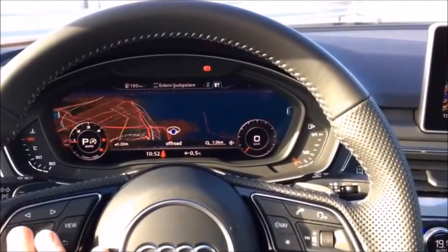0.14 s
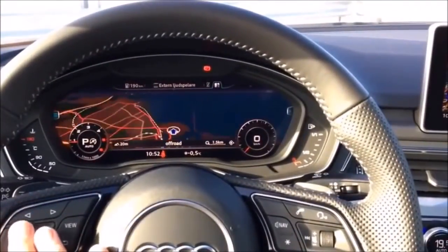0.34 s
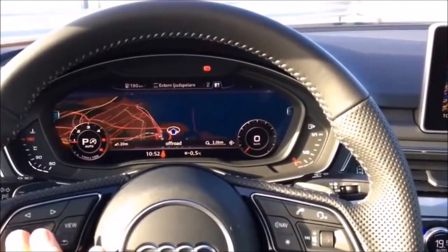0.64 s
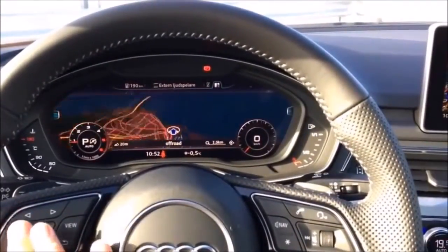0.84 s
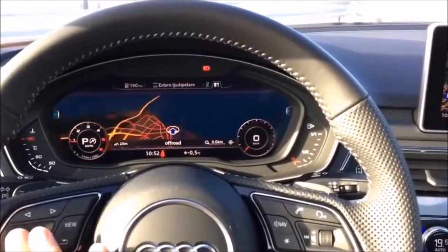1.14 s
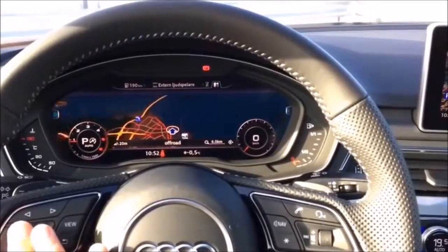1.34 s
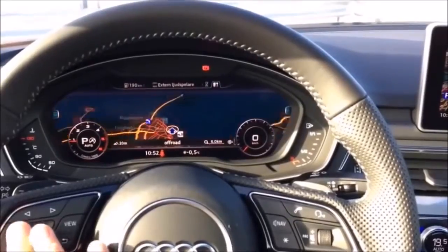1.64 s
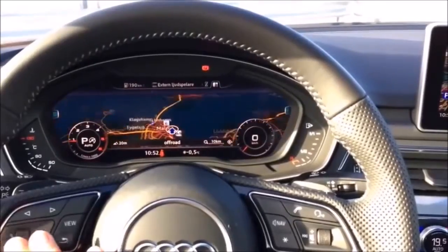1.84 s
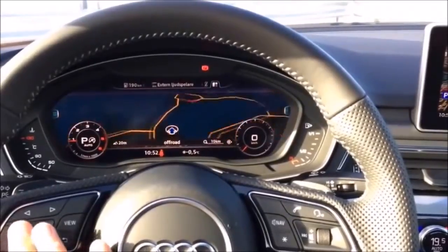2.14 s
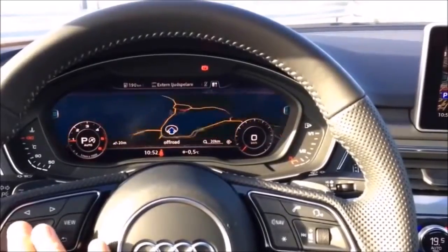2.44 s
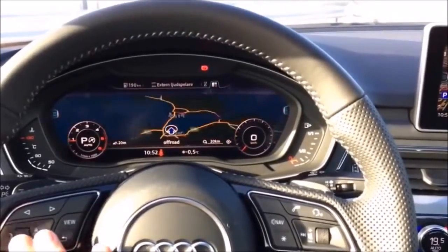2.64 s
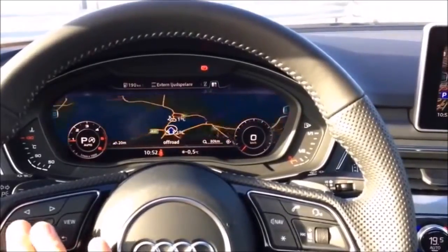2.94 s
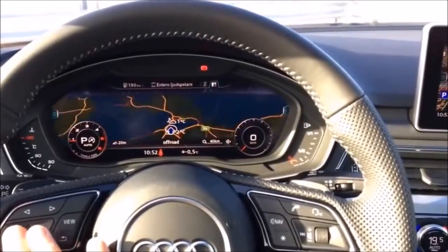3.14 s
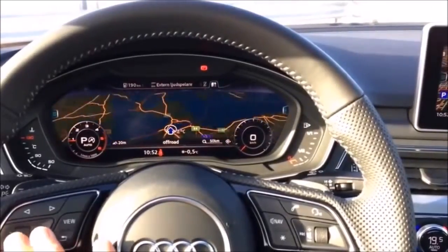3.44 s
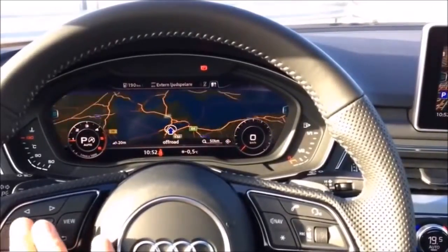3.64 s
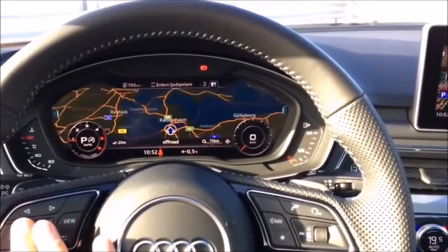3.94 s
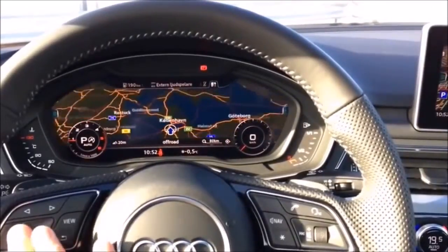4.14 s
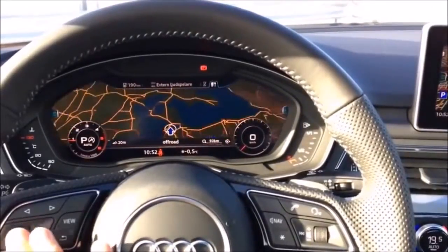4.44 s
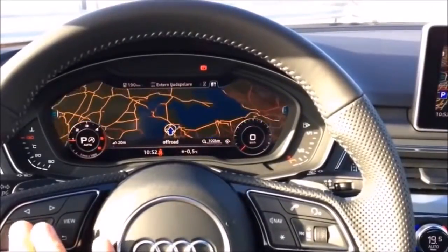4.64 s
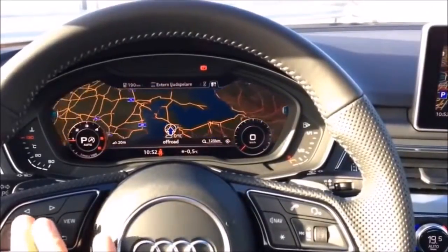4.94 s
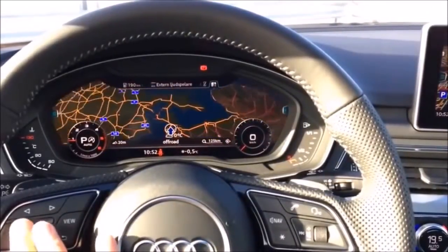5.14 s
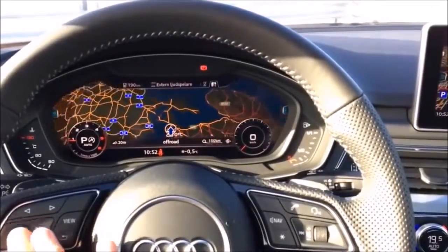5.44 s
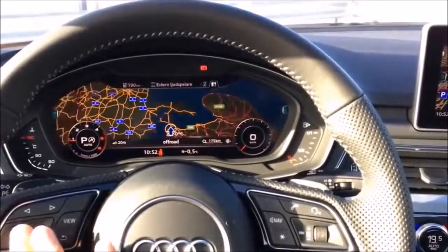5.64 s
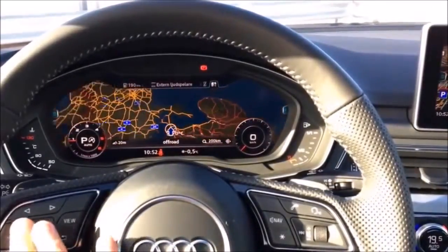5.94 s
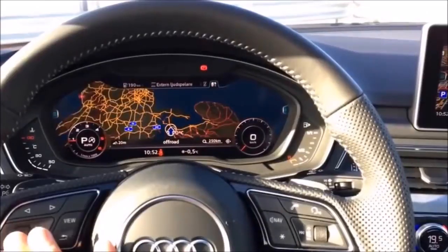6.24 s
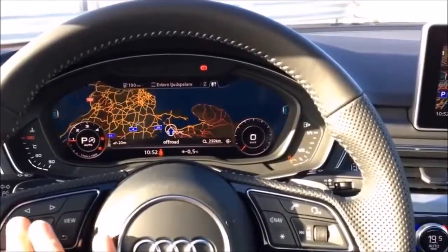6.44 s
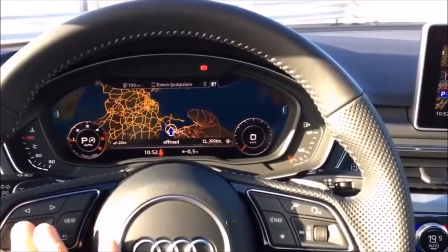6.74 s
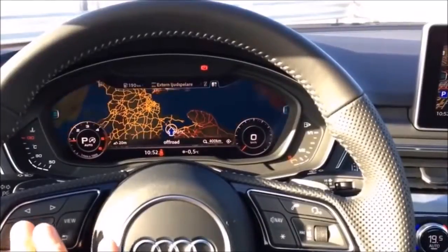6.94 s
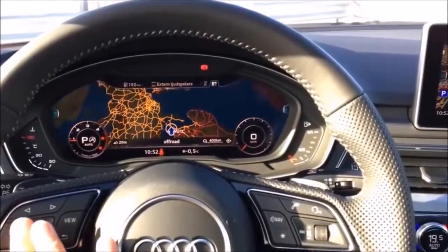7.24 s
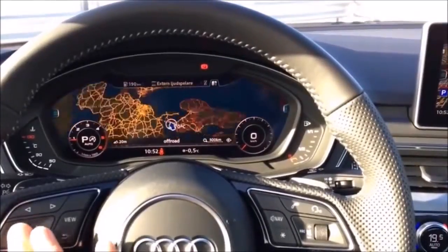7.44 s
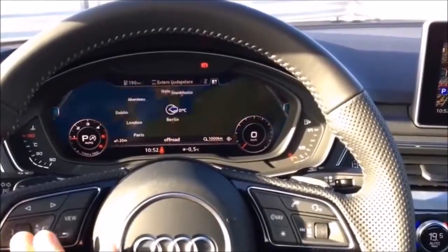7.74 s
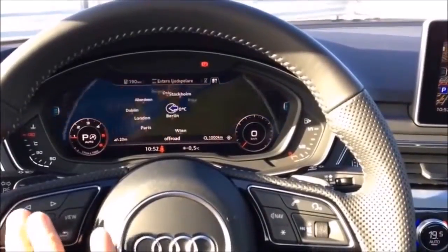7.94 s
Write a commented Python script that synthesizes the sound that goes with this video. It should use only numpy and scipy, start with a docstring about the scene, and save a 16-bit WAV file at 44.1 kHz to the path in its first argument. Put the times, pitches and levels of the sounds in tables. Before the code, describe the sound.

Close, dry ratcheting clicks with short thumb scuffs from a steering-wheel scroller, above a steady low idling hum and muffled cabin air.

```python
"""In a parked car the engine idles as a wavering stack of harmonics and the ventilation blows as shaped noise.
Over this bed a thumb rolls a small plastic scroll wheel on the steering wheel, about three notches a second.
At each notch the wheel takes up its play with a light tick, scuffs under the thumb as it rubs up the detent
ramp, snaps over, rebounds and settles: bursts and grainy noise through resonances. Stray nudges click between.
From two seconds on, the trim gives a few dull ticks, each a blow ringing a larger panel."""
import sys
import numpy as np
from scipy import signal
from scipy.fft import rfft, irfft
from scipy.io import wavfile

SR = 44100
rng = np.random.default_rng(int(sys.argv[2]) if len(sys.argv) > 2 else 0)


def put_to_file(sound):
    """Save the sound as 16-bit audio at rate SR, in the file named by the first command-line argument."""
    columns = np.atleast_2d(sound).T  # one column per channel
    safe = np.clip(columns, -1, 1)
    whole_steps = np.round(safe * 32767)
    wavfile.write(sys.argv[1], SR, whole_steps.astype(np.int16))


N = 357210
TIME = np.arange(N) / SR
SINCE = np.arange(-int(.03 * SR), int(.08 * SR)) / SR   # time around one contact [s]
CUTOFF_HZ = 15740   # top of the audible band here

# resonances of the wheel and switch housing, relative levels:
# (frequency [Hz], width [Hz], level when snapped [dB], level when rubbed [dB])
WHEEL_MODES = [(1200, 260, -7, 1.5), (1900, 290, 4, 10.5), (2330, 137, 6.5, 7), (2933, 190, 0.5, 6),
               (3260, 200, -4.5, -6.5), (4080, 79, -7.5, -3.5), (4400, 92, -7, 4.5), (4686, 92, 0.5, 2),
               (5720, 270, -7.5, -3), (6000, 200, -3.5, 1.5), (6640, 180, -7.5, -2.5), (7740, 250, -5, -6),
               (8350, 180, -5.5, -4), (8750, 220, 1, -11), (9100, 175, 2, -2.5), (9770, 190, -1.5, 3),
               (11020, 200, -4, 3.5), (12000, 410, -5, -5), (12930, 220, -2, 1), (13400, 290, -5.5, -3),
               (14400, 380, -5, -6), (15500, 780, -12, -13)]
# one row per notch of the wheel; grip time counts back from the snap, rebound and settle times on from it:
# (snap time [s], snap level [dB], grip time [s], grip level [dB], rebound time [s], rebound level [dB],
#  settle time [s], settle level [dB], rub level [dB], spring loading time [s], thumb drag level [dB],
#  coasting level [dB], spring ring [dB], brightness [dB per octave])
WHEEL_NOTCHES = [(.3, -61.5, .093, -84, 0.1, -70, .13, -86, -83, .025, -70, -96, 6, -.5),
                 (0.797, -59, .119, -69, .047, -69, 0.054, -70, -70, 0.053, -66, -81, 1, -1),
                 (1.274, -61, .057, -70, 0.048, -62, 0.094, -65, -75, .02, -64, -74.5, 3, 0.5),
                 (1.743, -54, .103, -71, 0.029, -69, .092, -74, -65, 0.032, -65, -77, 0, -.5),
                 (2.143, -54.5, .116, -72, 0.025, -58.5, .071, -73, -66.5, 0.047, -62, -77, 7.5, -1),
                 (2.535, -58.5, .13, -72, .033, -63, .06, -80, -67.5, 0.054, -63, -89, -2, 0),
                 (2.929, -57, .139, -69, 0.033, -63, .07, -64, -68, 0.041, -67, -78, -3, .5),
                 (3.321, -56, .128, -74, 0.027, -57.5, .075, -64, -67, 0.022, -62, -75, 0, 0),
                 (3.689, -53, 0.1, -76, 0.026, -57.5, .06, -67, -67, 0.036, -64, -77, 5, 0),
                 (4.011, -65, .106, -68, .036, -65, .078, -82, -71, 0.047, -68, -87, 0, 0.5),
                 (4.313, -61.5, .098, -68, .024, -58.5, .055, -65, -64, 0.028, -66, -75.5, -2, .3),
                 (4.646, -58.5, 0.1, -68, .029, -58.5, .077, -69, -65.5, .062, -65, -70.5, -1, -1),
                 (4.98, -62.5, 0.12, -75, 0.03, -62, 0.04, -66, -71, 0.046, -70, -79, 0, 0),
                 (5.297, -56, .087, -72, 0.027, -62, .06, -64, -73, 0.024, -65, -73, 1, 1),
                 (5.649, -55, .085, -66, .014, -71, .05, -63.5, -69, 0.043, -63, -90, -3, 1),
                 (5.976, -62, 0.11, -73, 0.035, -60.5, .055, -81, -69, 0.081, -66, -79, -4, -1),
                 (6.535, -55.5, 0.098, -82, 0.012, -61, 0.038, -66, -68, 0.035, -67, -74, 7, -0.5),
                 (6.934, -54, .094, -69, 0.023, -62, .043, -64, -62, 0.054, -57.5, -71, 1.5, -0.7),
                 (7.319, -66, 0.13, -69, .028, -64, 0.045, -71, -63.5, 0.15, -62.5, -80, -3, -2),
                 (7.648, -59, .103, -65, 0.019, -61, 0.037, -58, -61, 0.088, -63, -67.5, -3, 0.5),
                 (8.005, -56, .109, -72, 0.015, -54, .029, -63, -63.5, .079, -65, -70.5, 3, 0)]


def from_db(db):
    """Decibels to gain."""
    return 10 ** (np.asarray(db) / 20)


def drift(rate):
    """Smooth wander through 4000 random values of spread 1, `rate` a second; then the last one holds."""
    knots = rng.standard_normal(4000)
    return np.interp(TIME * rate, np.arange(len(knots)), knots)


def body(force, modes):
    """Parallel resonances (Hz, width, dB) of alternating sign, scaled so that white noise keeps its power."""
    out, power = 0, 0
    for k, (hz, width, level_db) in enumerate(modes):
        r = np.exp(-np.pi * width / SR)   # pole radius: a narrower mode rings longer
        gain = (-1) ** k * from_db(level_db)
        zeros = gain * (1 - r * r) / 2 * np.array([1, 0, -1])
        poles = [1, -2 * r * np.cos(2 * np.pi * hz / SR), r * r]
        out = out + signal.lfilter(zeros, poles, force + 1e-18)
        power += gain ** 2 * (1 - r * r) / 2
    return out / np.sqrt(power)


def engine(speed_wander, waver_db):
    """Harmonics of the firing rate; the idle speed hunts slightly and each harmonic wavers."""
    # engine hum: (multiple of the firing rate, rms level before wavering [dB])
    orders = [(1, -63.5), (2, -52), (3, -57.5), (4, -61), (6, -74.5), (7, -75.5), (8, -81), (9, -77),
              (12, -69), (13, -75.5), (15, -77)]
    firing_hz = 28.71 * (1 + speed_wander * drift(3))
    phase = 2 * np.pi * np.cumsum(firing_hz) / SR
    hum = np.zeros(N)
    for order, level_db in orders:
        strength = np.sqrt(2) * from_db(level_db + waver_db * drift(6.5))
        hum += strength * np.sin(order * phase + rng.uniform(0, 2 * np.pi))
    return hum


def cabin_air():
    """Steady rumble and airflow noise, muffled by the upholstery and coloured by the ducts."""
    # cabin rumble and ventilation, ahead of the duct boosts: (frequency [Hz], density [dB per Hz])
    air_spectrum = [(18, -88), (42, -74), (70, -72.5), (125, -74), (160, -79.5), (260, -80.5), (365, -84),
                    (440, -95.5), (780, -98.5), (1600, -99), (2100, -102.5), (2350, -111), (2750, -117),
                    (4800, -123), (9300, -124), (11000, -127), (15500, -129)]
    # air duct resonances: (frequency [Hz], width [Hz], boost [dB])
    duct_modes = [(603, 120, 4.5), (949, 76, 5), (1430, 58, 8.5)]
    hz = np.maximum(np.arange(N // 2 + 1) * SR / N, 1)
    points_hz, points_db = np.transpose(air_spectrum)
    level_db = np.interp(np.log(hz), np.log(points_hz), points_db)
    for centre, width, boost_db in duct_modes:
        level_db = level_db + boost_db / (1 + (2 * (hz - centre) / width) ** 2)
    hiss = rfft(rng.standard_normal(N))
    return irfft(hiss * from_db(level_db), N) * np.sqrt(SR / 2)


def contacts():
    """Each notch goes grip, snap, rebound, settle; gives thumb grips and spring blows as (s, dB)."""
    grips, blows = [], []
    for s, snap_db, grip_s, grip_db, rebound_s, rebound_db, settle_s, settle_db, *_ in WHEEL_NOTCHES:
        grips.append((s - grip_s, grip_db))
        blows += [(s, snap_db), (s + rebound_s, rebound_db), (s + settle_s, settle_db)]
    return grips, blows


def chatter(rise_s, fall_s):
    """A contact is a brief flurry of tiny impacts that builds up and dies away; peak 1."""
    envelope = np.exp(np.minimum(SINCE / rise_s, -SINCE / fall_s))
    return envelope * rng.choice([-1, 1], len(SINCE))


def wheel_body(force, s, mode_db, scatter_db):
    """The nearest notch sets brightness and spring ring; each contact gets its own mode mix and tuning."""
    mode_scatter = 0.0083   # detuning spread, as a share of each frequency
    spring_hz, spring_width_hz = 4730, 300   # the detent spring rings here, freer at some notches
    tilt_pivot_hz = 6000   # brightness turns the spectrum about this point
    crack_db, crack_low_hz = -12.5, 5460   # plain broadband crack of the contact itself
    hz, width = np.transpose(WHEEL_MODES)[:2]
    *_, spring_db, tilt_db = min(WHEEL_NOTCHES, key=lambda notch: abs(notch[0] - s))
    spring_ring_db = spring_db * np.exp(-((hz - spring_hz) / spring_width_hz) ** 2)
    brightness_db = tilt_db * np.log2(hz / tilt_pivot_hz)
    shift, strength = rng.standard_normal((2, len(hz)))
    tuned_hz = hz * (1 + mode_scatter * shift)
    mixed_db = mode_db + spring_ring_db + brightness_db + scatter_db * strength
    ringing = body(force, zip(tuned_hz, width, mixed_db))
    crack_band = signal.butter(2, [crack_low_hz, CUTOFF_HZ], "band", fs=SR, output="sos")
    return ringing + from_db(crack_db) * signal.sosfilt(crack_band, force)


def add(track, s, sound):
    """Lay the sound of one contact into the track at time s."""
    at = round((s + SINCE[0]) * SR)
    track[at:at + len(sound)] += sound[:N - at]


def wheel_clicks(events, mode_db, rise_s, fall_s, scatter_db):
    """Short contacts that set the wheel ringing."""
    out = np.zeros(N)
    for s, level_db in events:
        force = chatter(rise_s, fall_s)
        click = wheel_body(force, s, mode_db, scatter_db)
        treble = np.std(np.diff(click))   # the level is that of the treble, against the force
        add(out, s, from_db(level_db) * click * np.std(force) / treble)
    return out


def slide(pressure, grain_db, stick_slip_db):
    """Grainy, catching noise whose strength follows the pressure."""
    roughness = from_db(grain_db * drift(600) + stick_slip_db * drift(130))
    return pressure * roughness * rng.standard_normal(N)


def wheel_rub(swell, scatter_db):
    """The detent rubs harder as its spring is loaded, then the wheel coasts and rubs to a stop."""
    release_s = 0.045   # the snap unloads the spring and the rubbing eases
    coast_s, run_out_s = 0.071, 0.099   # end of steady coasting, standstill: both after the snap
    *_, rubbed_db = np.transpose(WHEEL_MODES)
    grain = slide(1, grain_db=1.5, stick_slip_db=2.9)
    out = np.zeros(N)
    for s, *_, rub_db, load_s, _, coast_db, _, _ in WHEEL_NOTCHES:
        near = np.abs(TIME - s) < .2   # all of a notch's rubbing lies this close to its snap [s]
        since = TIME[near] - s
        loading = from_db(rub_db) * np.interp(since, [-load_s, 0, release_s], [0, 1, 0]) ** swell
        coasting = from_db(coast_db) * np.interp(since, [0, release_s, coast_s, run_out_s], [0, 1, 1, 0])
        out[near] += wheel_body((loading + coasting) * grain[near], s, rubbed_db, scatter_db)
    return out


def thumb_drag(start_share, full_share):
    """While it loads the spring the soft thumb scuffs the ribbed rim: a duller scrape, gone by the snap."""
    # ribbed rim under the thumb, relative levels: (frequency [Hz], width [Hz], level [dB])
    rim_modes = [(1350, 320, -4), (1720, 240, 2), (1960, 140, 5), (2340, 130, 3), (2960, 170, -2),
                 (4720, 200, -17)]
    ease_s = 0.0044   # the drag eases just before the snap
    pressure = np.zeros(N)
    for s, *_, load_s, drag_db, _, _, _ in WHEEL_NOTCHES:
        stages_s = [-start_share * load_s, -full_share * load_s, -ease_s, 0]
        pressure += from_db(drag_db) * np.interp(TIME - s, stages_s, [0, 1, 1, 0])
    return body(slide(pressure, grain_db=1.5, stick_slip_db=2.5), rim_modes)


def wheel_creep(mode_db, scatter_db):
    """A short bright scratch swells into each snap as the tooth starts to slip over the crest."""
    creep_db, creep_s = -11, .016   # gain on the snap level, duration
    out = np.zeros(N)
    for s, snap_db, *_ in WHEEL_NOTCHES:
        swell = np.interp(SINCE, [-creep_s, 0], [0, 1], right=0) ** .5
        force = from_db(snap_db + creep_db) * swell * rng.standard_normal(len(SINCE))
        add(out, s, wheel_body(force, s, mode_db, scatter_db))
    return out


def thumbwheel():
    """Snaps and rubbing drive the same modes, from different points of the wheel."""
    # between notches the thumb nudges the wheel against its detent: (time [s], level [dB])
    nudges = [(.942, -72), (1.491, -60.5), (3.058, -65), (4.429, -67), (5.941, -64), (6.626, -63),
              (7.224, -67), (7.238, -61.5), (7.629, -56), (7.707, -65), (7.948, -70)]
    *_, snapped_db, rubbed_db = np.transpose(WHEEL_MODES)
    grips, blows = contacts()
    touches = wheel_clicks(grips, rubbed_db, rise_s=.0018, fall_s=.0035, scatter_db=3.0)
    rub = wheel_rub(swell=0.88, scatter_db=0.1)
    drag = thumb_drag(start_share=0.85, full_share=0.64)
    creep = wheel_creep(snapped_db, scatter_db=3.5)
    snaps = wheel_clicks(blows + nudges, snapped_db, rise_s=.002, fall_s=.0028, scatter_db=2.4)
    return touches + rub + drag + creep + snaps


def trim():
    """A larger panel rings lower and longer: it flicks out and back and rattles briefly."""
    # dull ticks: (time [s], mean level [dB], lowest frequency excited [Hz], hardness as cut-off [Hz])
    ticks = [(1.987, -69.5, 1600, 1600), (4.03, -68.5, 1200, 2000), (4.686, -56.5, 850, 6000),
             (6.597, -66, 1630, 1100)]
    # trim panel resonances, relative levels: (frequency [Hz], width [Hz], level [dB])
    panel_modes = [(850, 90, 5), (1108, 86, 7.5), (1364, 53, 6), (1600, 90, 3.5), (1760, 74, 2),
                   (1850, 120, 1), (2090, 125, 6), (2205, 100, 6), (2580, 52, 2.5), (3150, 71, -5),
                   (3480, 98, -9), (3970, 180, -12), (4450, 95, -8), (5020, 150, -12), (5550, 270, -14),
                   (6180, 300, -12), (7100, 900, -21)]
    flick_back_s, flick_back_share = 0.0041, 0.69   # spring-back delay, share of the blow's strength
    rattle_s, rattle_share = .009, .12   # decay, share of the blow's strength
    out = np.zeros(N)
    for s, level_db, low_hz, hard_hz in ticks:
        blow = 1.0 * (SINCE == 0)
        flick_back = flick_back_share * np.roll(blow, round(flick_back_s * SR))
        rattle = rattle_share * (SINCE > 0) * chatter(rattle_s, rattle_s)
        force = blow - flick_back + rattle
        # soft blows are dull, light ones thin
        force = signal.sosfilt(signal.butter(2, hard_hz, fs=SR, output="sos"), force)
        force = signal.sosfilt(signal.butter(4, low_hz, "high", fs=SR, output="sos"), force)
        tick = body(force, panel_modes)
        add(out, s, from_db(level_db) * tick / np.std(tick))
    return out


def scene():
    """Everything is close by in a dead-sounding cabin: the layers simply add, with no reverberation."""
    bed = engine(speed_wander=0.00304, waver_db=0.9) + cabin_air()
    return (bed + thumbwheel() + trim())[None, :]


def record(dry):
    """The top is cut steeply."""
    return signal.sosfilt(signal.ellip(10, .2, 70, CUTOFF_HZ, fs=SR, output="sos"), dry)


dry = scene()
out = record(dry)
put_to_file(out)
```